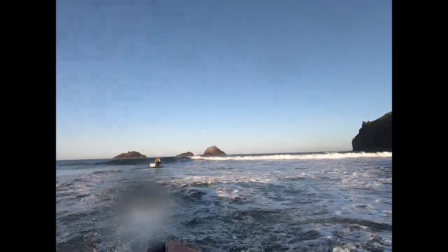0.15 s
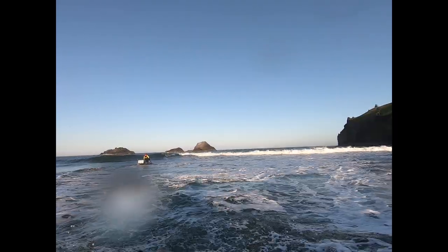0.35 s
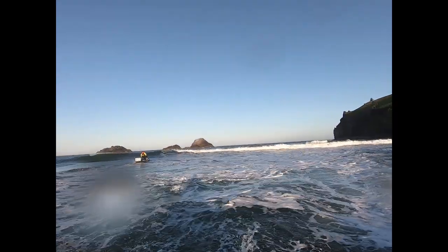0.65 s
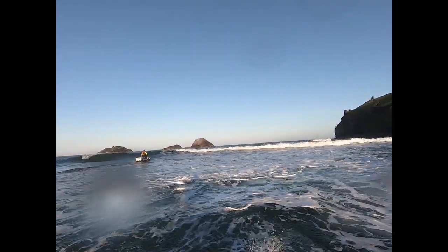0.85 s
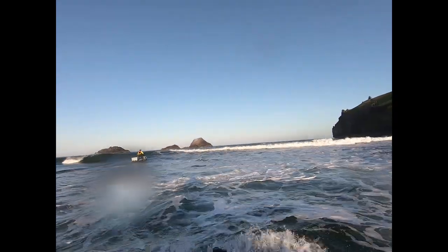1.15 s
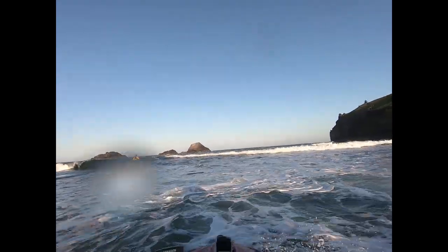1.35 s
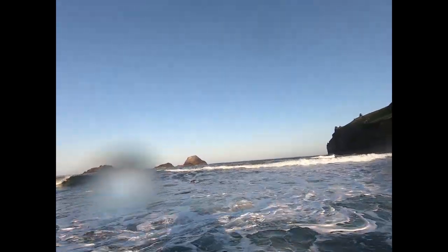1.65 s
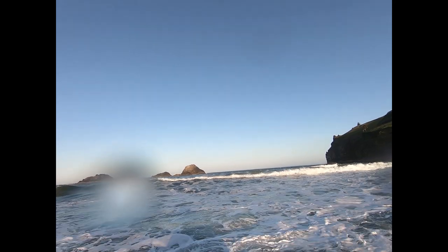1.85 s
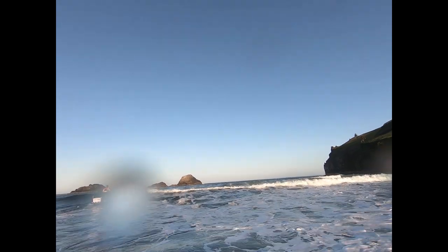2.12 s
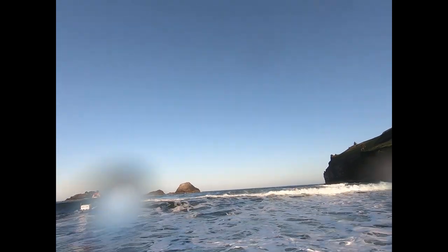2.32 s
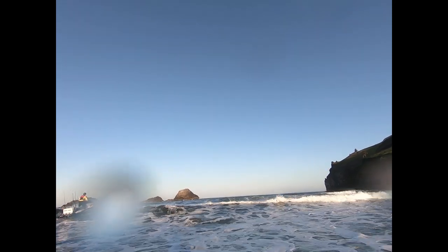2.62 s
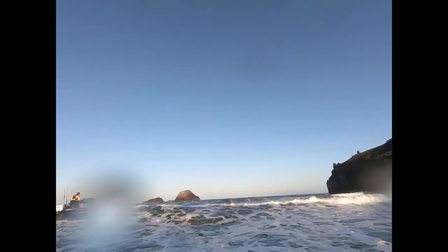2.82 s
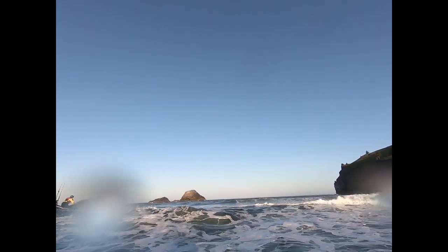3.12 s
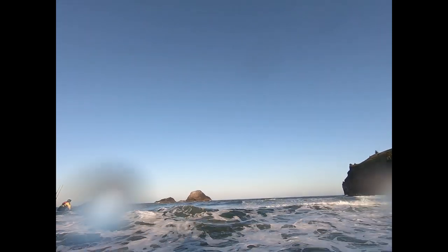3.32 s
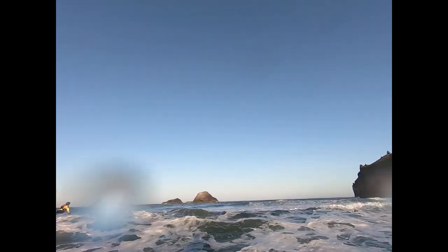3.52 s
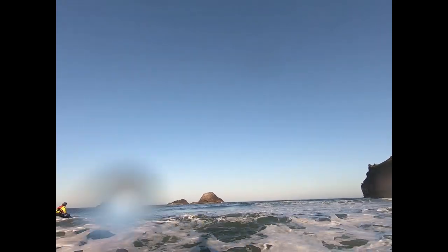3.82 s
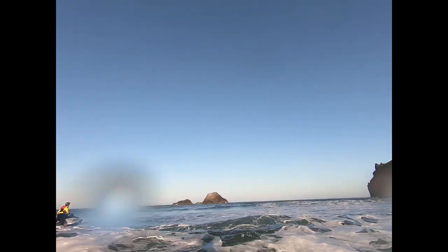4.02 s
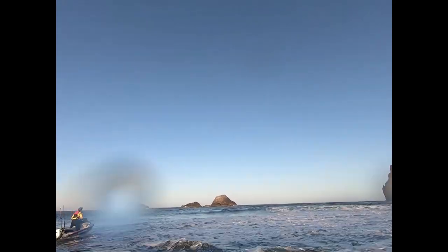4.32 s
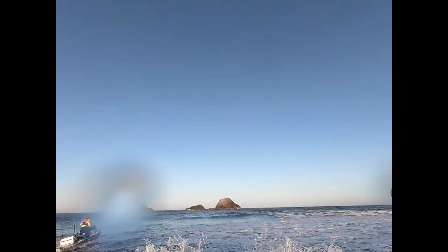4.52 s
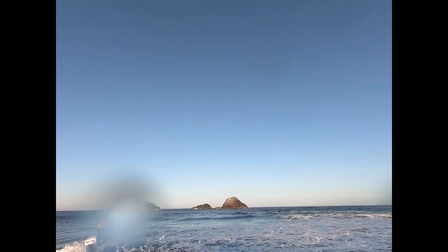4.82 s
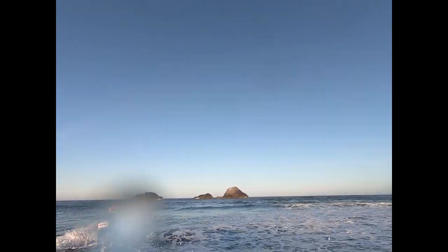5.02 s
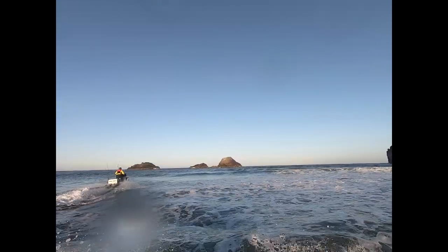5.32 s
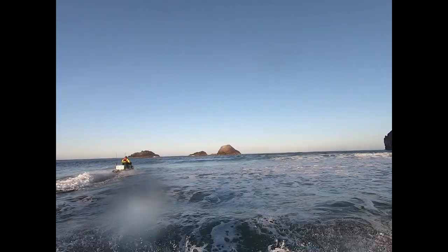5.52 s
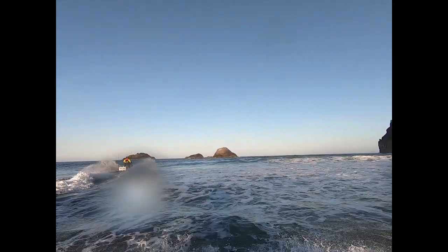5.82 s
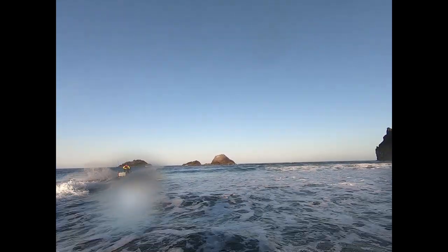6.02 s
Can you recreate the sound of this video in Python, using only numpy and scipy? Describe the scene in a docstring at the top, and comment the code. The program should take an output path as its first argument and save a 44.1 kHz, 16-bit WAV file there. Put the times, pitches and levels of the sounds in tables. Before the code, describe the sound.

A jet ski engine drones through churning surf, heard from on board, with water washing along the hull and spray hissing throughout. The engine revs at about 0.4 seconds, dips, then climbs to its highest pitch near 1.2 seconds. In these first two seconds the hull booms against waves, a few splashes throw bright spray, and low wind bumps hit the microphone. From 2 to 3 seconds the engine holds a fairly steady, lower drone while the wide sound narrows to mono and the spray dulls. It eases down and gets quieter from about 3.1 seconds, lifts slightly at 4.2, then sinks to a ragged near idle around 4.8, with a low surge of water and a wind bump. At 5 seconds it revs up sharply, the wash swells, and it runs high and wavering, easing a little by 6 seconds.

```python
"""A jet ski's engine drones and revs through churning surf, heard from on board.
The three cylinders rise and fall in pitch, sink almost to idle once, and open up again. The exhaust
swells as its harmonics glide through the pipe's resonances, with brief dips and surges on top.
The hull booms, the wake washes and sprays, and wind bumps the microphones.
The wide sound narrows to mono, and the spray's hiss dulls with it."""
import sys
import numpy as np
from scipy import signal
from scipy.fft import rfft, irfft
from scipy.io import wavfile
from scipy.ndimage import uniform_filter1d, minimum_filter1d

SR = 44100
rng = np.random.default_rng(int(sys.argv[2]) if len(sys.argv) > 2 else 0)


def store_wav(level_fs):
    """Save 16-bit WAV to argv[1]."""
    pcm = np.round(np.clip(np.atleast_2d(level_fs), -1, 1) * 32767)
    wavfile.write(sys.argv[1], SR, pcm.T.astype(np.int16))


N = 271215
TIME = np.arange(N) / SR

# engine speed: (time [s], firing rate [Hz])
FIRING_RATE = [(0.0, 104.8), (0.2, 109.9), (0.37, 145.5), (0.69, 104.1), (0.92, 166), (1.18, 188),
               (1.4, 159.5), (1.61, 145.6), (1.77, 150.7), (2.03, 121.7), (2.46, 121.9), (2.58, 136.0),
               (2.74, 125.8), (3.1, 123.9), (3.44, 87), (3.63, 80.3), (3.91, 78.3), (4.16, 100.0),
               (4.45, 96.9), (4.67, 55.5), (4.83, 41.3), (5.26, 174.6), (5.46, 145.3), (5.71, 164.3),
               (5.89, 158.8), (6.15, 132.7)]
# water rushing along the hull: (time [s], base level [dB])
WATER_FLOW = [(0.0, -33.5), (0.27, -30.5), (0.58, -35), (0.81, -30), (1.29, -29.5), (1.96, -32),
              (2.04, -36.5), (3.35, -39), (4.06, -31.5), (4.5, -29), (4.64, -36), (4.88, -35),
              (5.28, -26.5), (5.4, -28.5), (6.15, -32.5)]


def gain_of(db):
    """Decibels as amplitude."""
    return 10 ** (np.asarray(db) / 20)


def unit_rms(x):
    """The signal scaled to an RMS of one."""
    return x / np.sqrt(np.mean(x ** 2) + 1e-20)


def automation(rows):
    """Straight lines in time through (time [s], value) points."""
    return np.interp(TIME, *np.transpose(rows))


def response(rows, hz):
    """Each value column of a table, joined by straight lines over log frequency."""
    points_hz, *columns = np.transpose(rows)
    return [np.interp(np.log(hz + 1), np.log(points_hz), column) for column in columns]


def pan(balance_db):
    """Left and right gains whose mean is one; a negative balance leans right."""
    sides = gain_of([np.atleast_1d(balance_db) / 2, -np.atleast_1d(balance_db) / 2])
    return sides / sides.mean(0)


def ramp(at_s, length_s):
    """A smooth step from 0 to 1 around one moment."""
    return (1 + np.tanh((TIME - at_s) / length_s)) / 2


def swell(at_s, length_s):
    """A bell-shaped rise and fall around one moment."""
    return np.exp(-(2 * (TIME - at_s) / length_s) ** 2)


def swells(rows):
    """The summed gain of brief swells: (time [s], level [dB], length [s])."""
    return sum(gain_of(db) * swell(at_s, length_s) for at_s, db, length_s in rows)


def wobble(rate_hz):
    """Random drift of unit size, rolled off above the rate."""
    hz = np.fft.rfftfreq(N, 1 / SR)
    return unit_rms(irfft(rfft(rng.standard_normal(N)) / (1 + (hz / rate_hz) ** 4), N))


def rough_tone(cycles, multiple, rough, flutter_hz):
    """A partial at a multiple of a running cycle count, fluttering in level and phase."""
    flutter = 1 + rough * (wobble(flutter_hz) + 1j * wobble(flutter_hz))
    carrier = np.exp(2j * np.pi * (multiple * cycles + rng.random()))
    return unit_rms((flutter * carrier).real)


def relative_speed(cruise_hz=121):
    """Engine speed as a multiple of cruising speed."""
    return automation(FIRING_RATE) / cruise_hz


def water_noise(colour, patchy_db, flicker_db):
    """Stereo noise of one colour, with drifting patches and a flicker shared by all pitches."""
    # water at the two microphones: (frequency [Hz], correlation [0-1], left minus right [dB])
    stereo_image = [(60, 0.1, -2), (142, 1, -6), (324, 0.69, -5), (735, 0, -6.5), (2400, .2, -1),
                    (5000, .1, -3.5)]
    frames, hz = N // 512 + 5, np.fft.rfftfreq(2048, 1 / SR)
    a, b, c, d, patches = rng.standard_normal((5, frames, len(hz)))
    patches = uniform_filter1d(patches, size=6, axis=0)
    patches = unit_rms(uniform_filter1d(patches, size=24, axis=1))
    likeness, balance_db = response(stereo_image, hz)
    left = a + 1j * b
    right = likeness * left + np.sqrt(1 - likeness ** 2) * (c + 1j * d)
    spectra = np.array([left, right]) * pan(balance_db)[:, None] / np.sqrt(1 + likeness / 2)
    spectra *= gain_of(response(colour, hz)[0] + patchy_db * patches)
    spectra *= hz < 2 * colour[-1][0]  # silent from an octave above the colour's last point
    noise = signal.istft(spectra.swapaxes(1, 2), nperseg=2048, noverlap=1536)[1][:, :N]
    noise *= gain_of(flicker_db * wobble(rate_hz=28))
    return noise / noise.mean(0).std()


def wind(top_hz, width):
    """Short bumps of low turbulence, largely separate at each microphone."""
    # wind bumps: (time [s], level [dB], length [s])
    gusts = [(.72, -26, 0.25), (0.99, -27, 0.35), (1.28, -23, 0.28), (1.85, -22.5, 0.29),
             (2.07, -31.5, 0.21), (2.85, -36.5, 0.6), (4.68, -22, 0.22)]
    low_band = signal.butter(2, [18, top_hz], "bandpass", fs=SR, output="sos")
    air = rng.standard_normal(N) + width * rng.standard_normal((2, N))
    eddies = unit_rms(signal.sosfilt(low_band, air))
    return eddies * swells(gusts) * pan(balance_db=-7)


def spray():
    """Spray hisses, bright and splashy while wide, duller towards mono; a fine fizz joins later."""
    # spray in the air: (time [s], base level [dB])
    amount = [(0.0, -36), (0.57, -41.5), (1.2, -41.5), (1.83, -43.5), (1.95, -48), (2.7, -51.5),
              (3.89, -42.5), (4.3, -44), (4.73, -56.1), (5.06, -43), (5.33, -41.5), (5.52, -48), (5.8, -47),
              (6.15, -58.5)]
    # splashes that throw extra spray: (time [s], base level [dB], length [s])
    splashes = [(0.18, -43, 0.22), (0.755, -43.5, 0.055), (1.14, -42.5, 0.16)]
    # colours of the spray's hiss: (frequency [Hz], relative level [dB])
    bright_colour = [(700, -5.5), (1500, 8), (2200, 4.5), (3200, 3), (4000, -2.5), (4900, -4.5),
                     (6200, 2.5), (7000, -5), (8000, -11.5), (11000, -25), (13000, -31), (15500, -58)]
    dull_colour = [(500, -19), (1200, 8.5), (1750, 7), (2300, -1.5), (2700, -5), (3700, -2), (4500, -2.5),
                   (5500, -0.5), (6300, -10), (7200, -14.5), (9000, -22), (11200, -34), (15500, -57.5)]
    fizz_colour = [(10500, -69), (11400, -11), (12400, 0), (13500, -3.5), (15200, -13.5), (16000, -36)]
    level = gain_of(automation(amount))
    splashing = np.hypot(level, swells(splashes))
    bright = splashing * gain_of(0.74) * water_noise(bright_colour, patchy_db=0.35, flicker_db=0.5)
    dull = level * gain_of(2.12) * water_noise(dull_colour, patchy_db=0.88, flicker_db=0.5)
    fizz = level * gain_of(-22.5) * water_noise(fizz_colour, patchy_db=2.5, flicker_db=1.2)
    crossfade, fizz_in = ramp(at_s=2.2, length_s=0.19), ramp(at_s=4.305, length_s=0.1)
    return np.sqrt(1 - crossfade) * bright + np.sqrt(crossfade) * dull + fizz_in * fizz


def wake(firings, throb, churn_db, wash_db, churn_db_per_oct):
    """Low churn, heavier with speed and in each wave, and wash that throbs with the exhaust."""
    # colours of the water: (frequency [Hz], relative level [dB])
    churn_colour = [(20, -17), (45, -7), (85, -0.5), (120, 2.5), (165, -1), (230, -8.5), (330, -27),
                    (600, -54)]
    wash_colour = [(100, -28.5), (240, 1), (320, 1.5), (430, -5.5), (520, -5.5), (650, -11.5), (1050, -13),
                   (1300, -21), (1900, -27), (4000, -57.5)]
    # the hull ploughs into waves: (time [s], level [dB], length [s])
    waves = [(0.43, -22.5, 0.54), (1.3, -33, 0.12), (1.7, -29, 0.39), (4.64, -22, 0.22)]
    flow_db = automation(WATER_FLOW)
    running = gain_of(flow_db + churn_db + churn_db_per_oct * np.log2(relative_speed()))
    churn = np.hypot(running, swells(waves)) * water_noise(churn_colour, patchy_db=1, flicker_db=1)
    wash = gain_of(flow_db + wash_db) * water_noise(wash_colour, patchy_db=1, flicker_db=0.75)
    return churn + wash * (1 + throb * np.cos(2 * np.pi * firings))


def booms_and_rings():
    """Brief hull booms, and the engine's third harmonic ringing out near 410 Hz."""
    # brief tones: (time [s], level [dB], nominal pitch [Hz], length [s])
    tones = [(0.276, -26, 501, 0.039), (0.403, -15, 111.7, 0.16), (0.516, -16, 88, 0.081),
             (0.76, -23.5, 352.6, 0.036), (0.823, -30, 418, 0.13), (1.413, -19, 110.4, 0.1),
             (1.707, -21, 115, 0.49), (2.598, -35.5, 405, 0.2), (5.446, -30, 413, 0.25)]
    notes = np.zeros(N)
    for at_s, db, hz, length_s in tones:
        note = rough_tone(hz * TIME, 0.98, rough=0.16, flutter_hz=24)
        notes += gain_of(db) * swell(at_s, length_s) * note
    return notes * pan(balance_db=-4)


def burble(firings, level_db, fall_db_per_order):
    """Cylinders fire unequally: restless tones between the harmonics, stronger in heavy wash."""
    rounds = firings / 3  # all three cylinders fire once a round
    tones = sum(gain_of(-fall_db_per_order * order) * rough_tone(rounds, order, rough=0.8, flutter_hz=7.5)
                for order in [5, 7, 8, 10, 11, 13, 14])
    return gain_of(automation(WATER_FLOW) + level_db) * unit_rms(tones) * pan(balance_db=-16.5)


def hull_rasp(firings, firing_hz, boost_db, throaty_hz, fall_db_per_oct):
    """Upper harmonics, rougher with order and speed, glide through the hull's resonances."""
    # how the hull passes a harmonic: (frequency [Hz], gain [dB])
    hull = [(150, -33.5), (250, -25), (320, -32.5), (365, -44), (410, -35.5), (450, -34.5), (485, -37),
            (540, -45), (640, -43.5), (780, -49), (1120, -42), (1350, -62)]
    rasp = np.zeros(N)
    for order, rough, flutter_hz in [(3, 0.17, 12), (4, 0.25, 16), (6, 0.5, 40)]:
        harmonic = rough_tone(firings, order, rough * relative_speed() ** 2, flutter_hz)
        rasp += gain_of(response(hull, order * firing_hz)[0]) * harmonic
    octaves_off = abs(np.log2(firing_hz / throaty_hz))
    level_db = automation(WATER_FLOW) + boost_db - fall_db_per_oct * octaves_off
    return gain_of(level_db) * rasp * pan(balance_db=-11.5)


def crank_shake(firings, firing_hz, peak_db, resonance_hz, fall_db_per_oct):
    """The crank turns twice in three firings and shakes the hull most near one resonance."""
    crank_turns, crank_hz = firings * 2 / 3, firing_hz * 2 / 3
    level_db = peak_db - fall_db_per_oct * abs(np.log2(crank_hz / resonance_hz))
    hum = rough_tone(crank_turns, 0.98, rough=0.096, flutter_hz=25)
    return gain_of(level_db) * hum * pan(balance_db=-3.5)


def exhaust(firings, firing_hz, load_db, full_load_oct_per_s, ragged_below_hz):
    """The firing tone and its octave drone through the pipe's resonances, dipping and surging."""
    # how the pipe passes a harmonic: (frequency [Hz], gain [dB])
    pipe = [(55, -28), (80, -26), (106, -19), (125, -20.5), (160, -14.5), (190, -19.5), (212, -19.5),
            (248, -16), (290, -25), (322, -34.5), (342, -22), (380, -29)]
    # brief dips and surges: (time [s], length [s], firing tone change [dB], octave change [dB])
    dips_and_surges = [(0.247, 0.096, -1, -5.5), (0.377, 0.14, -22, -2.5), (0.559, 0.089, -7, -11.5),
                       (0.752, 0.095, 3, -11.5), (2.113, 0.22, 2, -6), (2.361, 0.18, -0.5, 0),
                       (2.831, 0.21, -7.5, -0.5), (2.985, 0.18, 1.5, 2), (3.311, 0.29, -14.5, -5),
                       (3.645, 0.69, -6, -8.5), (4.13, 0.26, -5.5, 6.5), (4.437, 0.085, -16, 0.5),
                       (4.605, 0.16, 1, -8.5), (4.861, 0.082, -18, 6), (5.023, 0.31, 6, -1.5),
                       (5.184, 0.12, -4.5, -5.5), (5.88, 0.25, 2, 0)]
    # the firing tone is louder while the engine speeds up, softer while it slows
    climb_oct_per_s = uniform_filter1d(np.gradient(np.log2(firing_hz)) * SR, size=6000)
    firing_db = response(pipe, firing_hz)[0] + load_db * np.tanh(climb_oct_per_s / full_load_oct_per_s)
    octave_db = response(pipe, 2 * firing_hz)[0] - 0.57
    for at_s, length_s, firing_change_db, octave_change_db in dips_and_surges:
        firing_db += firing_change_db * swell(at_s, length_s)
        octave_db += octave_change_db * swell(at_s, length_s)
    stumble = 0.41 * np.maximum(np.log2(ragged_below_hz / firing_hz), 0)  # ragged burning near idle
    drone = gain_of(firing_db) * rough_tone(firings, 1, rough=0.04 + stumble, flutter_hz=25)
    drone += gain_of(octave_db) * rough_tone(firings, 2, rough=0.06 + stumble, flutter_hz=25)
    return drone * pan(balance_db=-3.5)


def scene():
    """Engine, hull, water and wind in stereo."""
    firing_hz = automation(FIRING_RATE)
    firings = np.cumsum(firing_hz) / SR
    mix = exhaust(firings, firing_hz, load_db=0.9, full_load_oct_per_s=0.95, ragged_below_hz=83)
    mix += crank_shake(firings, firing_hz, peak_db=-24.5, resonance_hz=92.3, fall_db_per_oct=29.5)
    mix += hull_rasp(firings, firing_hz, boost_db=33, throaty_hz=85, fall_db_per_oct=5.5)
    mix += burble(firings, level_db=-2.5, fall_db_per_order=1.73)
    mix += booms_and_rings()
    mix += wake(firings, throb=0.27, churn_db=6, wash_db=3, churn_db_per_oct=4)
    return mix + spray() + wind(top_hz=62, width=2.4)


def record(dry):
    """The stereo image narrows to mono, a limiter holds the peaks, and the top treble is cut."""
    ceiling, cutoff_hz = 0.62, 15700
    mid = dry.mean(0)
    width = 1 - ramp(at_s=2.35, length_s=0.47)
    narrowed = mid + width * (dry - mid)
    allowed_gain = 1 / np.maximum(abs(narrowed).max(0) / ceiling, 1)
    limited = narrowed * uniform_filter1d(minimum_filter1d(allowed_gain, size=600), size=600)
    limited *= signal.windows.tukey(N, 0.001)  # click-free ends
    lowpass = signal.firwin(511, cutoff_hz, window=("kaiser", 9), fs=SR)
    return signal.oaconvolve(limited, lowpass[None], "same", axes=1)


dry = scene()
out = record(dry)
store_wav(out)
```